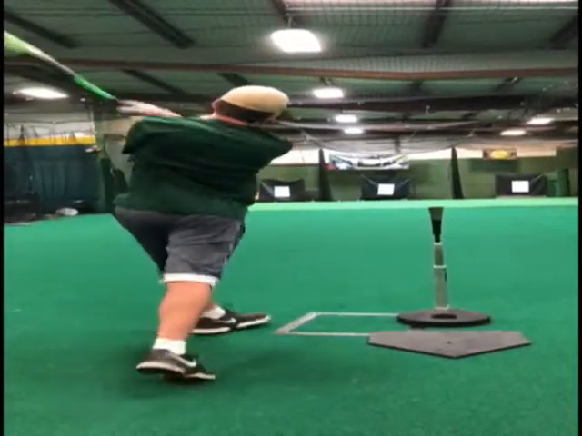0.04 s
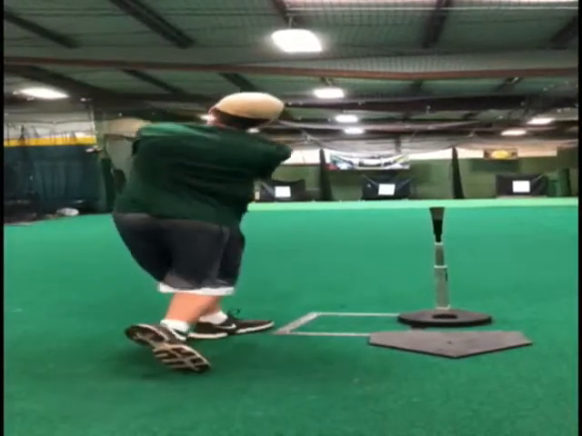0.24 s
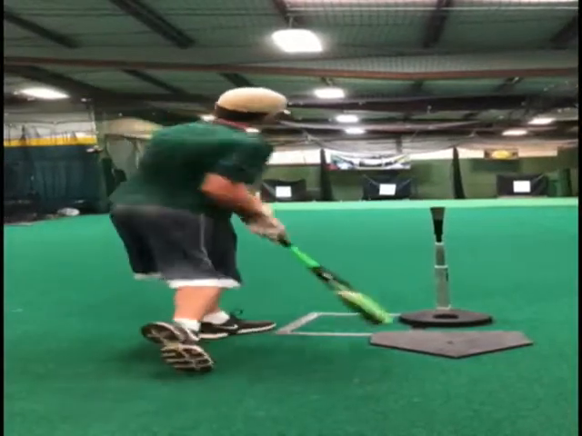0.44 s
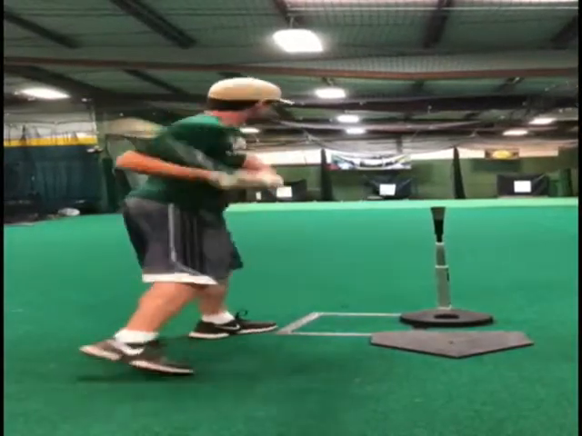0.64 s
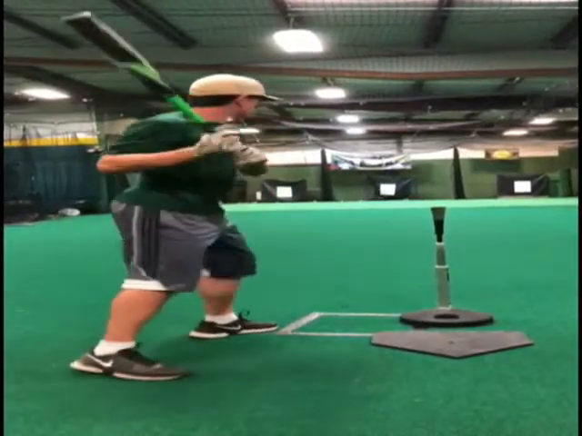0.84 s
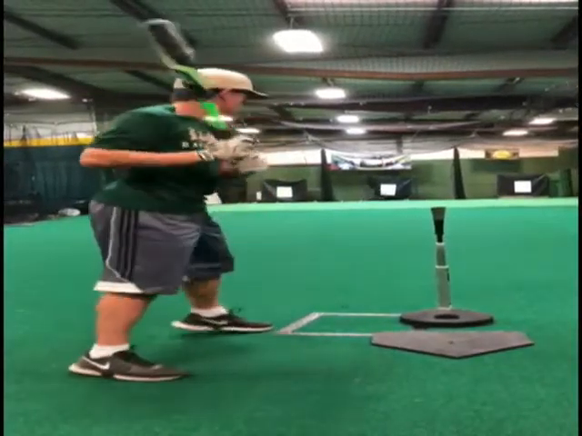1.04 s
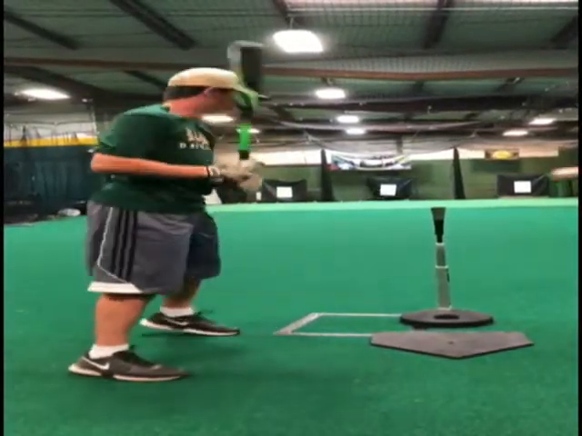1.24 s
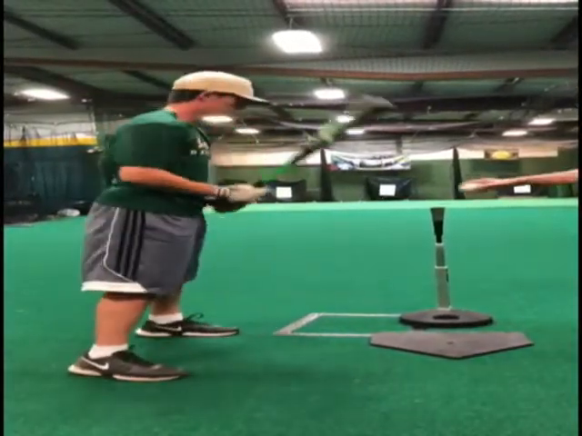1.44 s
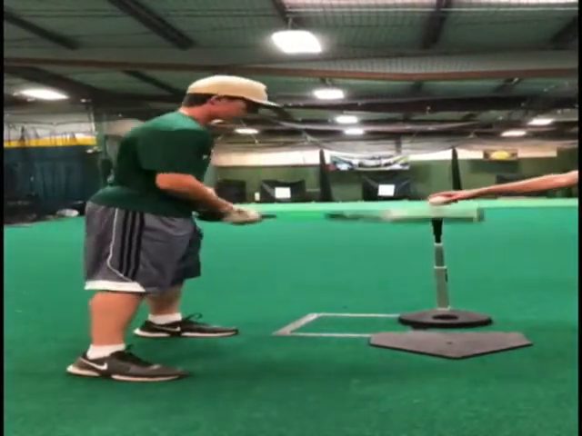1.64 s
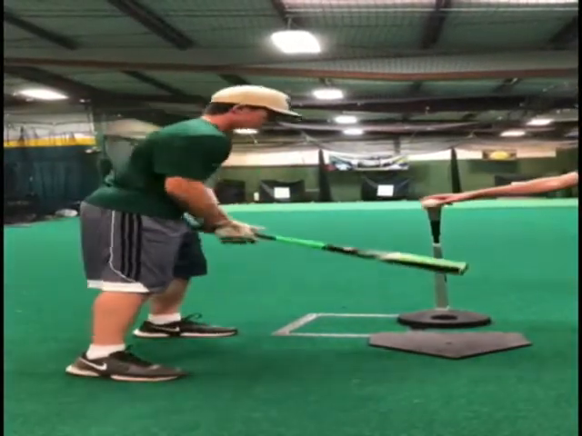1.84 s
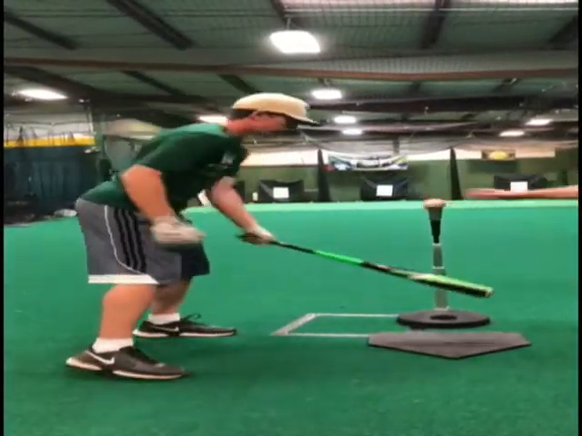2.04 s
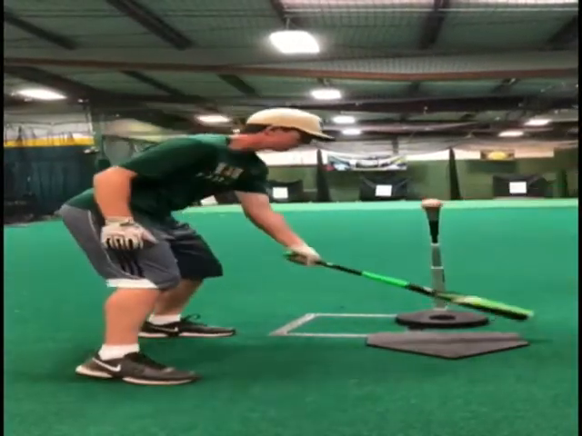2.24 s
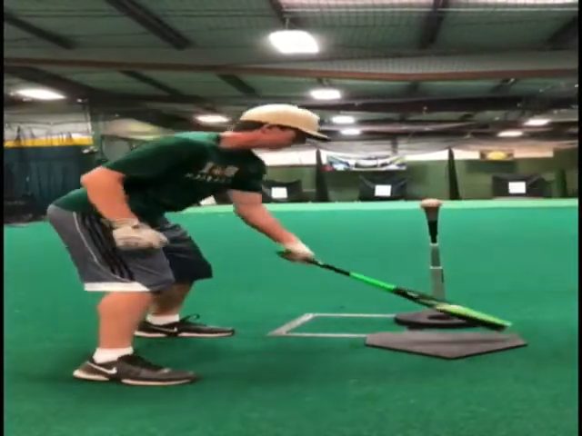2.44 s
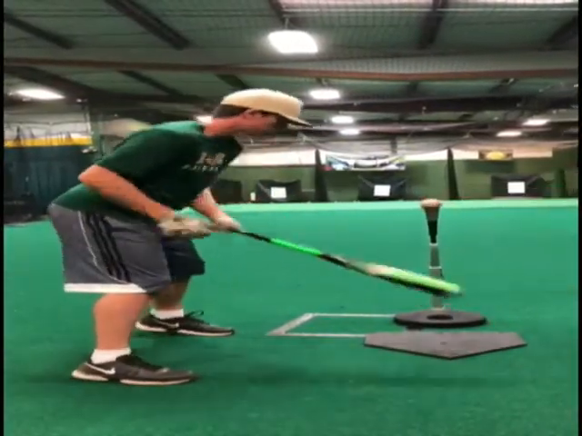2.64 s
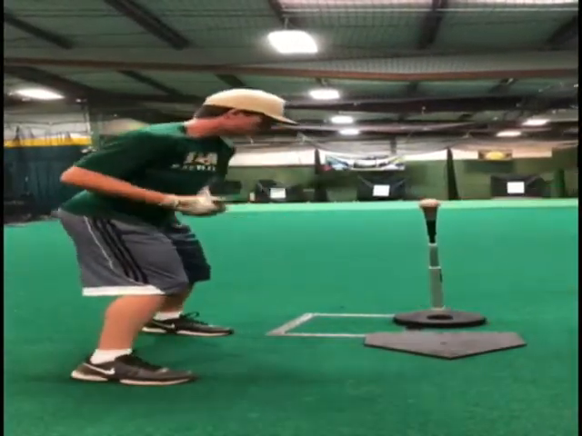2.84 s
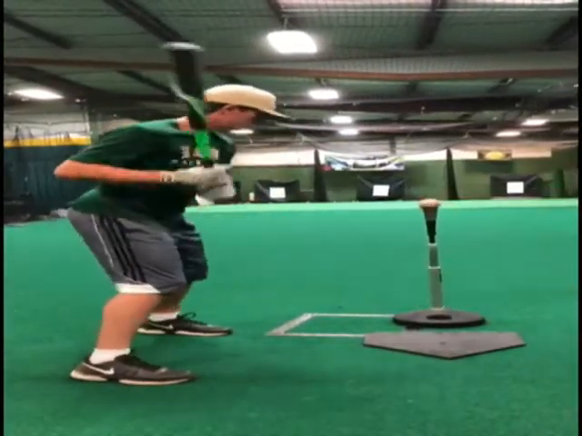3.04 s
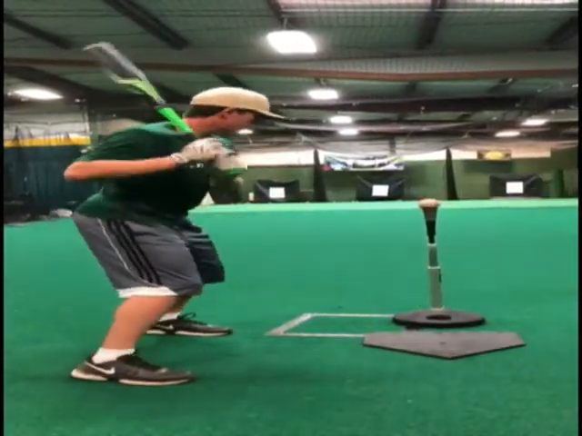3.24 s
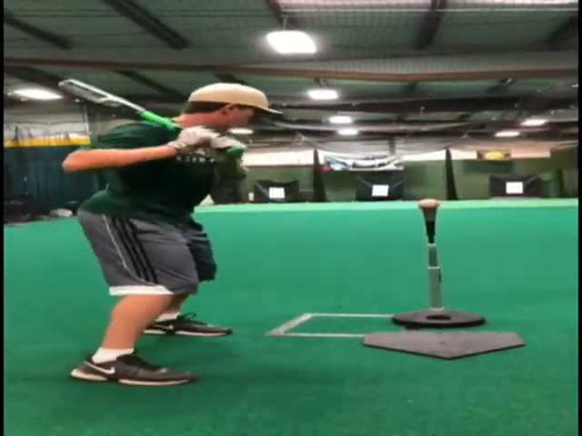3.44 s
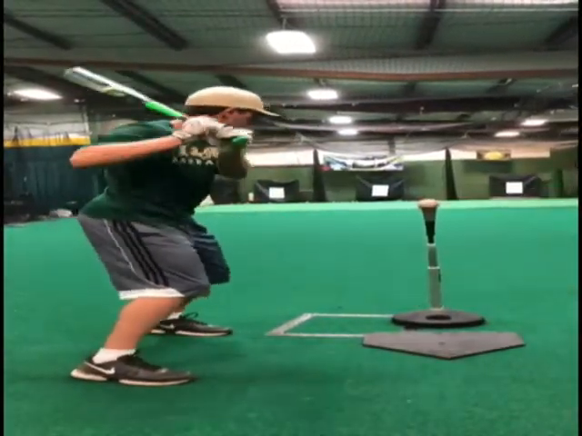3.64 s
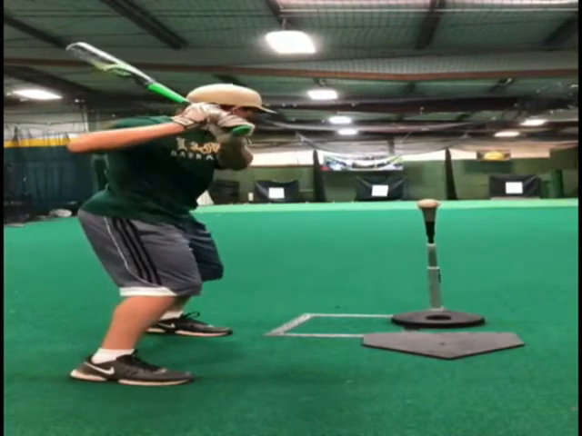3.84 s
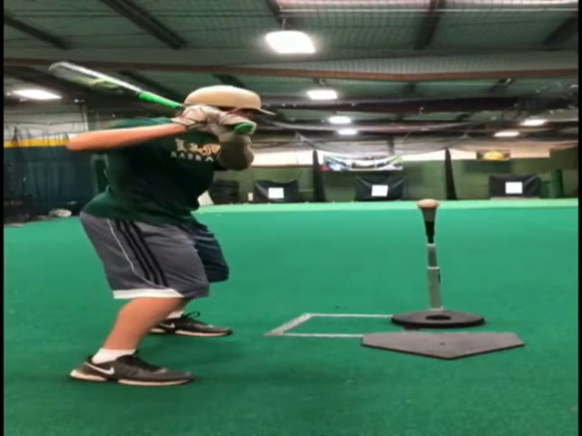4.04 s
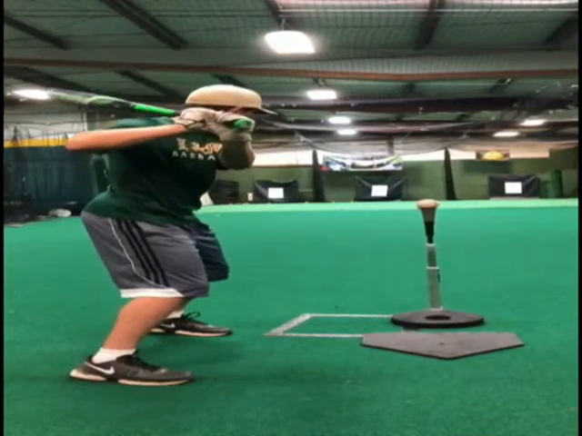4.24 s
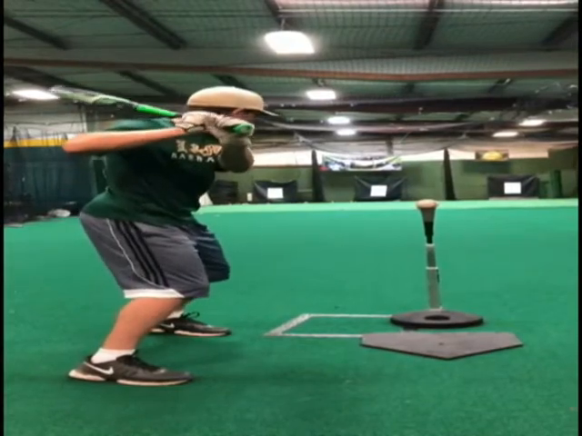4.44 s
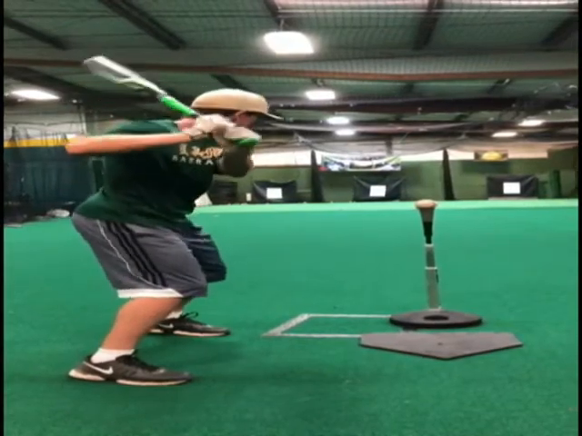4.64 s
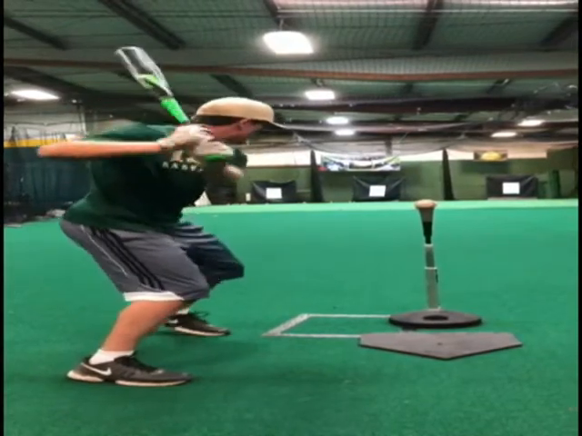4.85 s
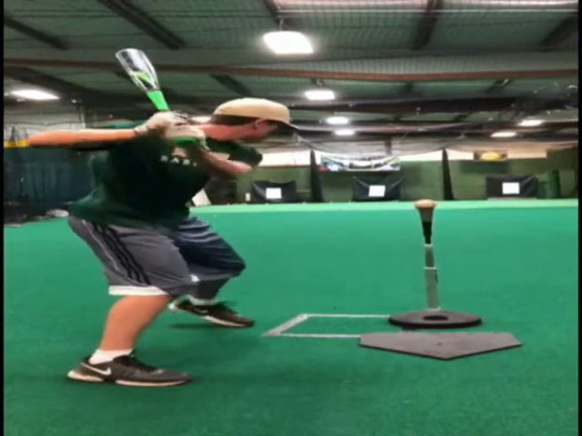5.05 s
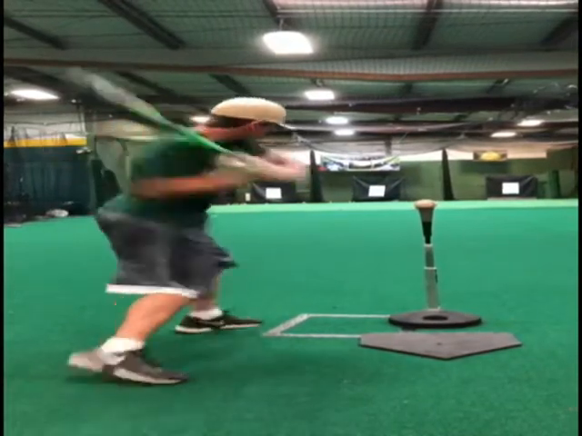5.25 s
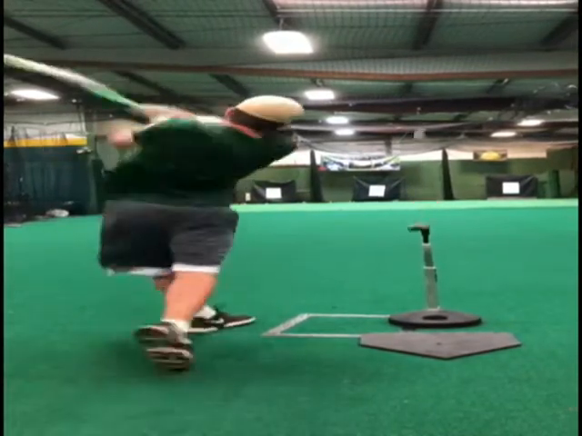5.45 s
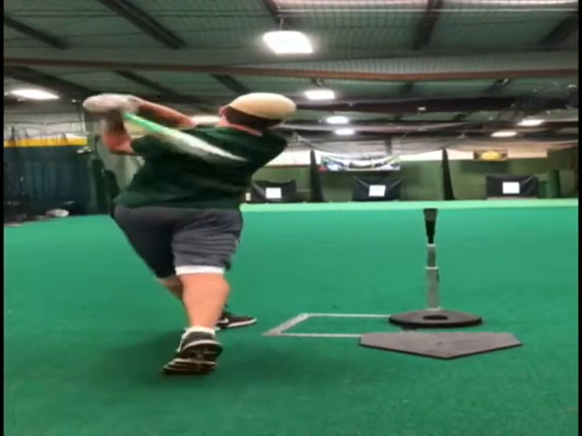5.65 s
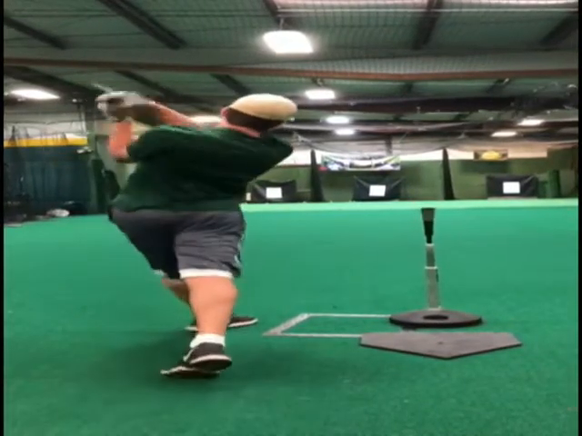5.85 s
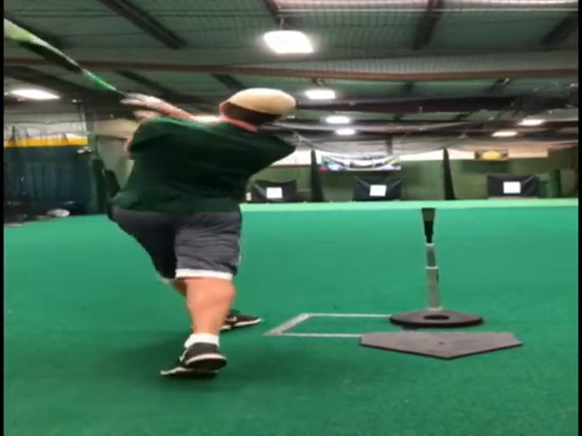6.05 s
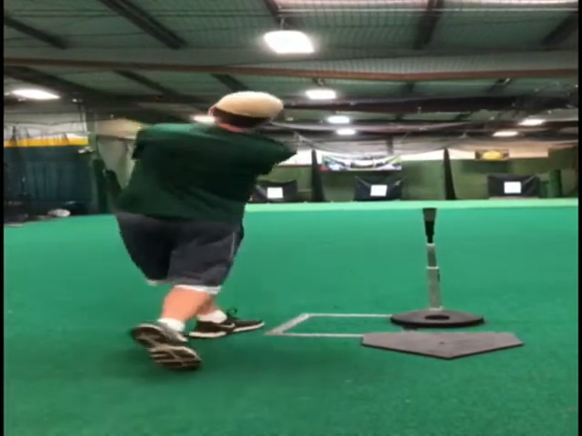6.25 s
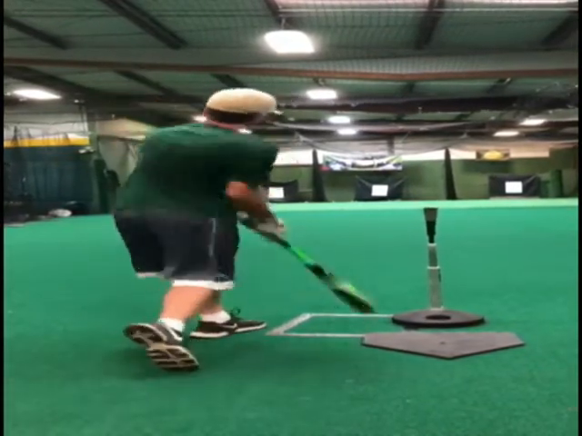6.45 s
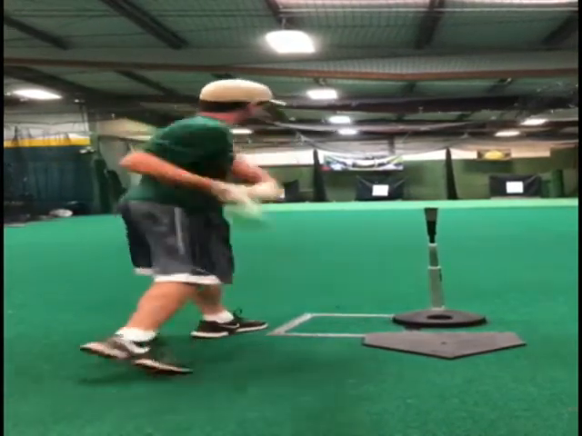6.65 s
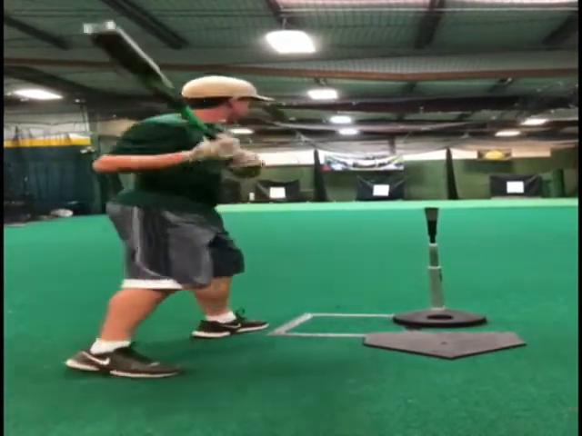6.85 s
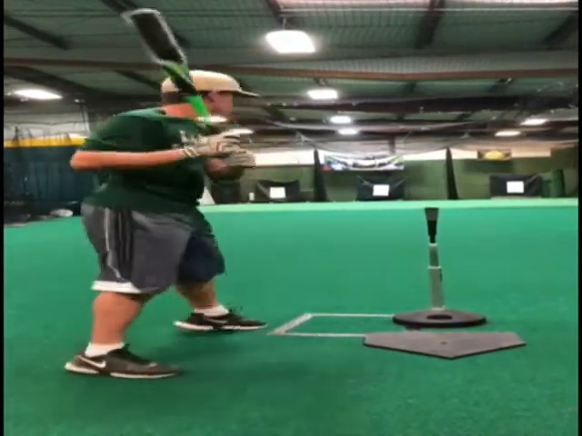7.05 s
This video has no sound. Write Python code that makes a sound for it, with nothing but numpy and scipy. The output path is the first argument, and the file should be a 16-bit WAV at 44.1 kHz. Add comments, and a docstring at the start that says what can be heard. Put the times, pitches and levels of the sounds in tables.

```python
"""A bat swings and cracks a ball off a tee, heard from one phone microphone in an indoor practice hall.
The barrel rings briefly; roof, nets and walls answer in separate echoes and a long bright tail.
Around the hit, shoes and clothes scuff on the turf, rubber squeaks and the bat taps the plate.
Balls thud into padding near and far, and at the start an earlier crack is still dying away.
Underneath is the room tone: lamp ballasts humming over the air handling."""
import sys
import numpy as np
from scipy import signal
from scipy.fft import rfft, irfft, next_fast_len
from scipy.io import wavfile
from scipy.ndimage import map_coordinates

SR = 44100
rng = np.random.default_rng(int(sys.argv[2]) if len(sys.argv) > 2 else 0)


def bounce(signal):
    """Save signal as a 16-bit WAV file at the path given by the first command-line argument."""
    frames = np.transpose(np.atleast_2d(signal))
    limited = np.clip(frames, -1, 1)
    pcm = np.round(limited * 32767).astype(np.int16)
    wavfile.write(sys.argv[1], SR, pcm)


N = 313726

# modes of the barrel under the ball: (frequency [Hz], level [dB], t60 [s])
BARREL_MODES = [(507, -20, 0.013), (1070, -10.5, 0.047), (2040, -6.5, 0.033), (2520, -9.5, .04),
                (3030, -12.5, 0.036), (4600, -14, 0.019)]
# single echoes off roof, nets and walls: (time [s], level [dB], centre [Hz], t60 [s])
WALL_ECHOES = [(5.5903, -15, 1490, 0.044), (5.591, -17, 5830, 0.035), (5.6022, -10, 880, 0.019),
               (5.61, -18, 5260, 0.014), (5.636, -15, 3000, .025), (5.670, -23, 3500, 0.023),
               (5.710, -19.5, 1000, .03), (5.734, -21.5, 2550, 0.071), (5.797, -40, 7500, .027),
               (5.915, -38, 4000, 0.014)]
# reverberation time of the hall: (frequency [Hz], t60 [s])
HALL_T60 = [(100, 1.3), (350, 0.95), (500, 0.3), (700, 0.68), (1000, 0.97), (1400, 1.265), (2500, 1.39),
            (5000, 1.24), (10000, 0.85), (16000, 0.75)]
# hall colour after the crack and after the earlier one: (frequency [Hz], density [dB])
CRACK_TAIL = [(35, -43), (60, -16), (113, -25), (527, -7), (607, 4), (666, -6.5), (822, -3), (1860, -9),
              (2190, -6.5), (3940, -10), (4970, -9), (13600, -28.5), (16000, -34.5)]
EARLIER_TAIL = [(290, -55), (500, -20), (530, -31), (595, -11), (795, -15), (1440, -3), (2460, -2),
                (4530, -7), (16000, -40)]
# balls landing in the padding: (time [s], level [dB], depth [0-1], t60 [s], pitch [ratio])
PAD_HITS = [(.754, -37.5, 0.06, 0.081, 1.01), (0.8443, -15.5, 0.18, 0.14, 1.01),
            (.862, -16.5, 0.87, .12, .99), (6.594, -25.5, 0, .065, 1.21)]
# softer rebounds, low echoes and footfalls: (time [s], level [dB], depth [0-1])
SOFT_BLOWS = [(.779, -39, 0.38), (0.884, -28, .94), (.951, -28, 0.96), (.985, -30.5, .64),
              (1.03, -34, 0.22), (1.06, -30, 0.8), (1.099, -43, 0.57), (1.169, -43, 1),
              (1.205, -43.5, 0.86), (1.251, -43.5, 0.75), (1.55, -52, 0.2), (3.876, -52, 1),
              (5.601, -43, .3), (5.745, -42, 0), (6.141, -49, 1), (6.567, -53, 0), (6.634, -42, 0.2),
              (6.676, -38.5, 0.04), (6.72, -40.5, 0.3), (6.745, -43, 0.3), (6.785, -49.5, 0.12),
              (6.83, -43.5, 0.54)]
# modes of the padding: (frequency [Hz], level [dB], ring length [multiple of the blow's t60])
PAD_MODES = [(70.3, -11.5, 1.7), (100.9, -1.5, 1.4), (137, 3, 1.2), (185.4, 3.5, 1.1), (254, 3.5, .9),
             (310, 0, .8), (351.5, 0.5, .9)]
# dull noise of the padding: (frequency [Hz], density [dB])
PAD_PUFF = [(30, -42), (60, -6), (200, -1), (400, -11.5), (600, -26), (1000, -29), (2500, -55.5),
            (5000, -79.5)]
# slaps on its cover: (time [s], level [dB], centre if far [Hz], hall level [dB], near [0 or 1])
COVER_SLAPS = [(.753, -60, 700, -50.5, 0), (0.8434, -12.5, 5330, -37.5, 1), (6.591, -48, 1000, -52.5, 0)]
# hall colour after a slap near the microphone and far from it: (frequency [Hz], density [dB])
NEAR_TAIL = [(260, -32), (450, -2), (607, -6), (922, -6.5), (1280, -14.5), (2330, -18), (6930, -19.5),
             (14800, -34.5), (16000, -42)]
FAR_TAIL = [(290, -32), (500, -2.5), (661, -14), (866, -5), (1040, -4.5), (1490, -4), (2100, -7),
            (2500, -14), (5000, -23.5), (6500, -40), (11000, -60)]
# the batter's movements: (start [s], length [s], turf level [dB], cloth and grip level [dB])
BATTER_MOVES = [(0.138, .06, -67, -66), (0.263, .11, -58, -68), (0.484, 0.25, -68, -73),
                (1.299, 0.16, -68, -70.5), (1.514, 0.056, -62, -66.5), (1.642, 0.077, -74, -68),
                (1.898, 0.017, -80, -67), (1.941, 0.017, -81, -70.5), (2.086, 0.019, -74, -77),
                (2.157, 0.1, -79.5, -82), (2.378, 0.037, -65.5, -73.5), (2.443, 0.1, -73, -75),
                (2.59, 0.18, -70, -72.5), (2.904, 0.046, -72.5, -72), (2.99, 0.15, -76, -72.5),
                (3.184, 0.026, -70, -61), (3.21, .042, -70, -59), (3.26, .06, -70, -70),
                (3.34, .14, -72, -72), (3.483, 0.074, -72.5, -72), (3.804, 0.028, -71.5, -73.5),
                (3.87, 0.051, -79, -98), (4.967, .15, -78.5, -77), (6.398, .19, -69, -71),
                (6.62, .1, -61, -74), (6.677, 0.11, -71, -65), (6.76, .1, -68, -71),
                (6.844, 0.054, -64, -64), (6.91, .2, -64, -69)]
# friction of shoes on turf and of clothes: (frequency [Hz], density [dB])
TURF_SCUFF = [(200, -6), (500, -4), (1000, 0), (2000, -3), (3500, -14), (7000, -30.5)]
CLOTH_RUSTLE = [(1500, -34), (3000, 5), (5000, 1), (8000, -5), (12000, -10), (16000, -11.5)]
# rubber: (start [s], length [s], first pitch [Hz], last pitch [Hz], level [dB], overtones [0-1])
RUBBER_SQUEAKS = [(1.948, .018, 2700, 7000, -66, .4), (3.197, .014, 2800, 3500, -56, .6),
                  (3.219, .019, 2700, 3050, -56, .7), (3.236, .007, 3220, 4530, -50, .5),
                  (3.241, 0.01, 4300, 3200, -51, .5), (6.681, .046, 4350, 2890, -55, 0.2),
                  (6.732, 0.025, 3100, 3300, -64, .15)]
# small ticks and taps: (time [s], relative tick level [dB], knock level [dB])
SMALL_TAPS = [(1.397, -56.5, -67), (1.9117, -48, -68), (1.95, -55, -71), (1.985, -58, -67),
              (2.1043, -60, -59), (2.387, -64, -72), (2.5744, -44, -46), (2.8382, -47, -59),
              (2.9257, -65, -74), (3.1847, -44, -69), (3.8292, -62, -65)]
# the bat end on the rubber plate: (frequency [Hz], level [dB], t60 [s])
PLATE_MODES = [(384, -35.5, 0.018), (585, -41, 0.015), (800, -37.5, 0.016), (1100, -48, 0.027),
               (1560, -49, 0.016), (3400, -54, .04)]
# tones of lamps and fans, ballast first: (frequency [Hz], rms level [dB], waver [dB])
HUM_TONES = [(120.1, -47, .45), (201.6, -63, 2.5), (247, -73.5, 3), (294, -75, 2.5), (585, -81, 3),
             (720, -83, 4), (838, -89, 0.5), (1085, -89, 5)]
# faint ballast buzz: (frequency [Hz], rms level [dB])
BUZZ_TONES = [(1319, -91), (2283, -101), (2401, -95), (2638, -99), (2998, -99), (3359, -100), (3779, -100),
              (4021, -99)]
# air handling and hiss: (frequency [Hz], density [dB])
AIR_NOISE = [(15, -72), (25, -25.5), (64, -10), (89, -17.5), (123, -10), (145, -9.5), (166, -14),
             (212, -9.5), (326, -26), (714, -32), (2110, -47.5), (7110, -48.5), (16000, -64)]
# swells of a far drone near 200 Hz: (start [s], length [s], level [dB])
FAR_DRONE = [(1.843, 0.47, -51.5), (2.4, 0.515, -57.5)]

PLATE_S, SWING_S, CRACK_S, NET_S = 2.5613, 5.303, 5.5762, 5.977
TAIL_SIZE = SR + SR // 3


def bat_crack():
    """The barrel rings under the ball, the turf repeats the snap, then after a gap the walls answer."""
    out, t = np.zeros(N), np.arange(TAIL_SIZE) / SR
    contact = (1 - np.exp(-(t / .0007) ** 2)) * (amp(-20) + np.exp(-(t / .0034) ** 6))
    add(out, CRACK_S, contact * ringing(BARREL_MODES, len(t)))
    add(out, CRACK_S, amp(-5) * burst(10040, .0036, drop_db=-4))  # snap
    add(out, CRACK_S + .0026, amp(-13) * burst(2500, .004, drop_db=14))  # off the turf
    arrival = amp(-13.5) + 1 / (1 + np.exp(-np.clip((t - .015) / .00076, -50, 50)))
    flutter = amp(1.6 * wobble(39.7, len(t)))  # late echoes arrive in clumps
    add(out, CRACK_S, amp(-22.7) * arrival * flutter * hall_tail(CRACK_TAIL))
    hollow_note = ringing([(598, -19, .16)], len(t)) * (1 - np.exp(-t / .0042))
    add(out, CRACK_S + .02, hollow_note)
    for s, db, hz, t60 in WALL_ECHOES:
        add(out, s, amp(db) * burst(hz, t60, drop_db=11))
    return out


def far_net(hz=7999.5):
    """The ball reaches the far net with a short hiss that carries into the hall."""
    out = np.zeros(N)
    add(out, NET_S, amp(-45) * burst(hz, .07, drop_db=9, size=SR // 2))
    add(out, NET_S, amp(-46) * hall_tail(band(hz, 19)))
    return out


def padding_thuds(hit_rise_s=.0036, soft_rise_s=.0071, soft_t60=.14):
    """Deep blows favour the padding's low modes; a slap of the cover starts the direct ones."""
    out, t = np.zeros(N), np.arange(SR // 3) / SR
    blows = [(s, db, depth, hit_rise_s, t60, pitch) for s, db, depth, t60, pitch in PAD_HITS]
    blows += [(s, db, depth, soft_rise_s + .0076 * depth, soft_t60, 1) for s, db, depth in SOFT_BLOWS]
    for s, db, depth, rise, t60, pitch in blows:
        def tilt(hz):
            octaves = np.log2(hz / 190)
            return -14 * (depth - .3) * octaves - 9 * max(0, -octaves) * (1 - depth)
        ring = 0
        for hz, level, length in PAD_MODES:
            decay = amp(level + tilt(hz) + rng.normal(0, 2.3) - 60 * t / (t60 * length))
            ring += decay * np.sin(2 * np.pi * pitch * hz * rng.normal(1, .011) * t)
        colour = [(hz, level + tilt(hz)) for hz, level in PAD_PUFF]
        puff = amp(-5.5 - 60 * t / (1.86 * t60)) * noise(colour, len(t))
        add(out, s, amp(db) * (ring + puff) * (1 - np.exp(-t / rise)))
    for s, db, hz, hall_db, near in COVER_SLAPS:
        add(out, s, click(db) if near else amp(db) * burst(hz, .016, drop_db=20.5))
        tail = hall_tail(NEAR_TAIL, 1.055) if near else hall_tail(FAR_TAIL, 1.36)
        add(out, s + .00201, amp(hall_db) * tail)
    return out


def batter(shuffle_db=-78.5, rustle_db=-92.5, swing_db_per_s=39):
    """Shoes and clothes rub in fine grains, never quite still; the swing grows up to the crack."""
    to_crack = CRACK_S - np.arange(N) / SR
    growth = amp(swing_db_per_s * (CRACK_S - SWING_S - np.abs(to_crack)))
    swing = swell(SWING_S, 1, attack=.019, release=1) * (to_crack > 0) * growth
    whip_db = 11 * np.exp(-(to_crack / .03) ** 2)  # last rush before contact
    scuffs, rustles = np.zeros((2, N))
    for s, length, turf_db, cloth_db in BATTER_MOVES:
        linger = amp(-18) * swell(s, length, length, release=.09)  # the hall carries each movement on
        scuffs += amp(turf_db) * (swell(s, length, .35 * length, release=.05) + linger)
        rustles += amp(cloth_db) * (swell(s, length, .35 * length, release=.022) + linger)
    turf = scuffs + amp(shuffle_db + 1.5 * wobble(14)) + swing * amp(-64 + whip_db)
    cloth = rustles * amp(2.04 * wobble(45)) + amp(rustle_db) + swing * amp(-66.5)
    turf_grains = amp(wobble(60)) * noise(TURF_SCUFF)
    cloth_grains = amp(1.84 * wobble(250)) * noise(CLOTH_RUSTLE)
    return turf * turf_grains + cloth * cloth_grains


def squeaks():
    """Rubber squeaks on a shaky, gliding pitch."""
    out = np.zeros(N)
    for s, length, first_hz, last_hz, db, edge in RUBBER_SQUEAKS:
        progress = np.linspace(0, 1, round(length * SR))
        hz = (first_hz + (last_hz - first_hz) * progress) * (1 + .03 * wobble(720, len(progress)))
        phase = 2 * np.pi * np.cumsum(hz) / SR
        tone = np.sin(phase) + edge * np.sin(2 * phase) + edge ** 3 * np.sin(3 * phase)
        add(out, s, amp(db + 5.3 * wobble(290, len(progress))) * np.sin(np.pi * progress) * tone)
    return out


def taps():
    """Short ticks, each with a dull knock and a little of the hall."""
    out = np.zeros(N)
    for s, tick_db, knock_db in SMALL_TAPS:
        add(out, s, amp(tick_db - 8.5) * burst(5000, .0087, drop_db=17))
        add(out, s, amp(knock_db) * burst(540, .035, drop_db=10.5))
        add(out, s + .016, amp(tick_db - 28) * hall_tail(band(3160, 9), .97))
    return out


def plate_tap():
    """The bat end meets the rubber plate: a click, a damped ring, then the hall."""
    out = np.zeros(N)
    add(out, PLATE_S, click(-33))
    add(out, PLATE_S + .001, ringing(PLATE_MODES, SR // 10))
    add(out, PLATE_S + .014, amp(-56.5) * hall_tail(band(690, 9.7), .65))
    return out


def earlier_crack():
    """Only the tail of an earlier hit, still dying away in the hall."""
    out = np.zeros(N)
    add(out, 0, amp(-42.5) * hall_tail(EARLIER_TAIL, .99))
    return out


def room_tone(fan_drift=.007, air_db=-58.5):
    """Ballasts hold their pitch, fan tones wander, air rushes; a far drone swells and breaks off."""
    t, tones = np.arange(N) / SR, np.zeros(N)
    ballast_hz = HUM_TONES[0][0]
    for hz, db, waver_db in HUM_TONES:
        peak = np.sqrt(2) * amp(db + waver_db * wobble(16))
        drift_s = (hz > ballast_hz) * fan_drift * np.cumsum(wobble(30)) / SR
        tones += peak * np.sin(2 * np.pi * (hz * (t + drift_s) + rng.random()))
    buzz = sum(amp(db) * np.sqrt(2) * np.sin(2 * np.pi * hz * t) for hz, db in BUZZ_TONES)
    swells = sum(amp(db) * swell(s, length, .57 * length, release=.036) for s, length, db in FAR_DRONE)
    drone = swells * noise([(140, -30), (170, 6), (200, 2), (250, -2.5), (300, -56)])
    air = amp(air_db + 2 * wobble(4)) * noise(AIR_NOISE)
    return tones + buzz + drone + air


def hall_tail(spectrum, stretch=1):
    """Reverberation: each frequency dies at its own speed; stretch scales the hall's t60."""
    hz, t, frames = signal.stft(noise(spectrum, TAIL_SIZE), SR, nperseg=256)
    decay = amp(-60 * t / (stretch * along(HALL_T60, hz)[:, None]))
    return signal.istft(frames * decay, SR, nperseg=256)[1][:TAIL_SIZE]


def burst(hz, t60, drop_db, size=SR // 5):
    """A puff of noise that starts at once and dies away."""
    t = np.arange(size) / SR
    return amp(-60 * t / t60) * (1 - np.exp(-t / (.014 * t60))) * noise(band(hz, drop_db), size)


def ringing(modes, size):
    """Damped sines from rows of (frequency [Hz], level [dB], t60 [s])."""
    t = np.arange(size) / SR
    return sum(amp(db - 60 * t / t60) * np.sin(2 * np.pi * hz * t) for hz, db, t60 in modes)


def click(db):
    """A hard edge: a few high cycles with some spray."""
    edge = ringing([(6040, db, .0026), (4080, db - 7.5, .0032)], SR // 5)
    return edge + amp(db - 16) * burst(8000, .0079, drop_db=14)


def swell(s, length, attack, release):
    """A gain that rises from time s, holds until length has passed, then loses 9 dB per release."""
    t = np.arange(N) / SR - s
    return np.clip(t / attack, 0, 1) ** 2 * np.exp(-np.maximum(t - length, 0) / release)


def band(hz, drop_db):
    """A broad spectrum, down by half of drop_db an octave to either side of hz."""
    return [(hz / 8, -2 * drop_db), (hz / 2, -drop_db / 2), (hz, 0),
            (hz * 2, -drop_db / 2), (hz * 8, -3 * drop_db)]


def noise(spectrum, size=N):
    """Coloured noise of rms 1."""
    x = filtered(rng.standard_normal(size), lambda hz: amp(along(spectrum, hz)))
    return x / np.sqrt(np.mean(x ** 2) + 1e-20)


def filtered(x, response):
    """x through a frequency response."""
    size = next_fast_len(len(x) + 8192)
    return irfft(rfft(x, size) * response(np.fft.rfftfreq(size, 1 / SR)), size)[:len(x)]


def wobble(rate, size=N):
    """A smooth random curve, rate knots a second."""
    knots = rng.standard_normal(int(size * rate / SR) + 4)
    return map_coordinates(knots, [np.arange(size) * rate / SR], order=2)


def along(points, hz):
    """Interpolates (frequency [Hz], value) points on a log axis."""
    freqs, values = np.transpose(points)
    return np.interp(np.log(hz + 1), np.log(freqs + 1), values)


def add(track, s, sound):
    """Mixes a sound in from time s."""
    part = track[round(s * SR):][:len(sound)]
    part += sound[:len(part)]


def amp(db):
    return 10 ** (np.asarray(db) / 20)


def scene():
    """The hall as it reaches the microphone, in mono."""
    surroundings = room_tone() + batter() + squeaks() + taps() + plate_tap()
    return (surroundings + bat_crack() + far_net() + earlier_crack() + padding_thuds())[None]


def record(dry, bass_hz=48, top_hz=16000, skirt_hz=300):
    """The phone microphone adds hiss, rounds off the highest peaks and cuts deep bass and top treble."""
    def response(hz):
        low_cut = -hz ** 2 / (bass_hz ** 2 - hz ** 2 + 1.4j * bass_hz * hz)
        return low_cut * np.clip((top_hz - hz) / skirt_hz, 0, 1) ** 2
    with_hiss = dry[0] + amp(-83) * rng.standard_normal(N)
    rounded = with_hiss / (1 + np.abs(with_hiss / .7) ** 6) ** (1 / 6)
    return filtered(rounded, response)[None]


dry = scene()
out = record(dry)
bounce(out)
```